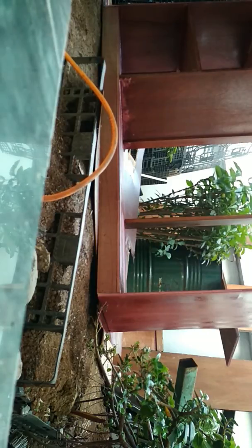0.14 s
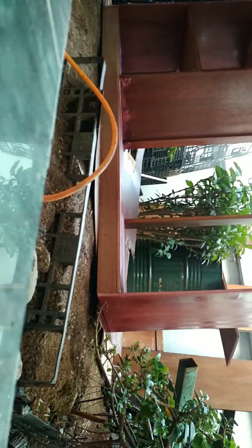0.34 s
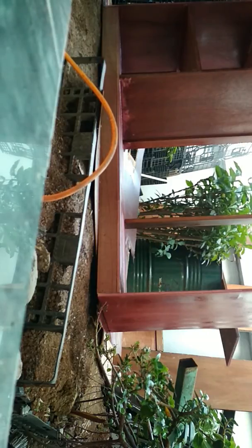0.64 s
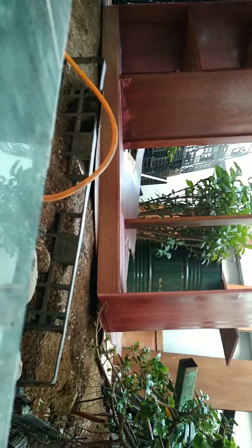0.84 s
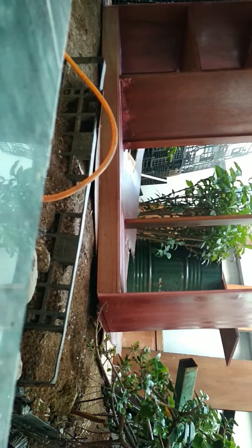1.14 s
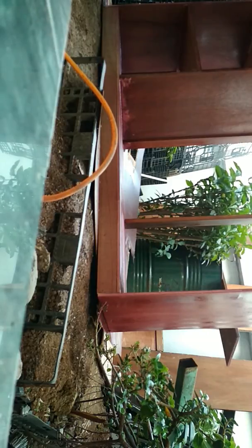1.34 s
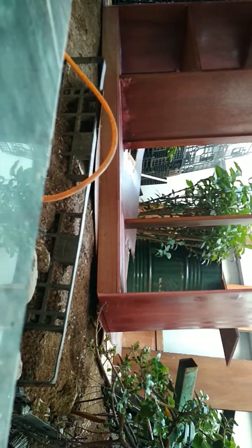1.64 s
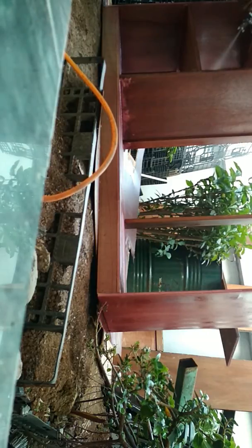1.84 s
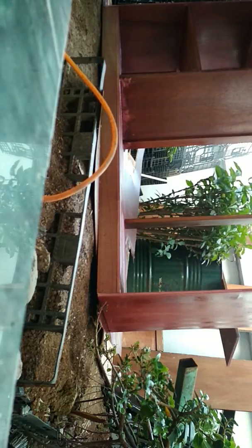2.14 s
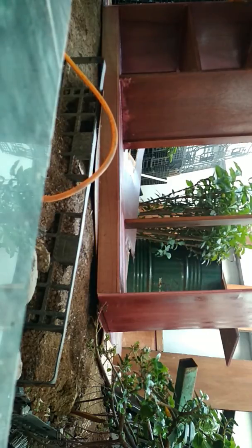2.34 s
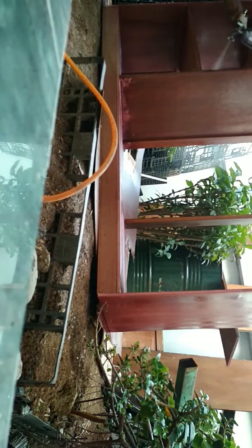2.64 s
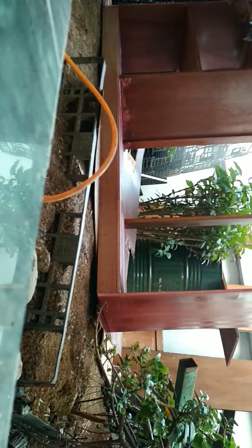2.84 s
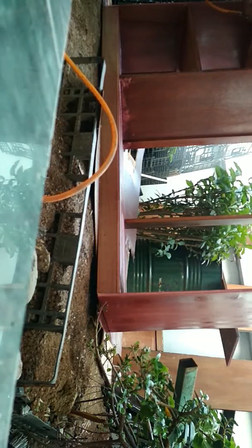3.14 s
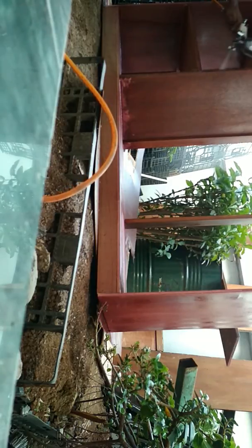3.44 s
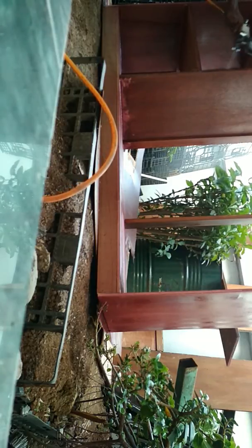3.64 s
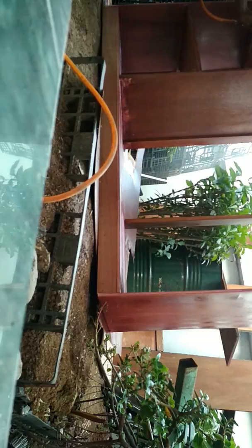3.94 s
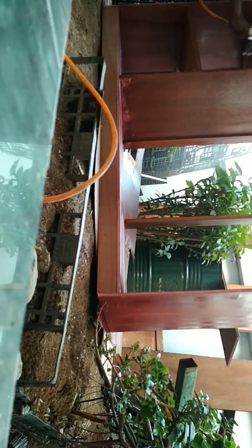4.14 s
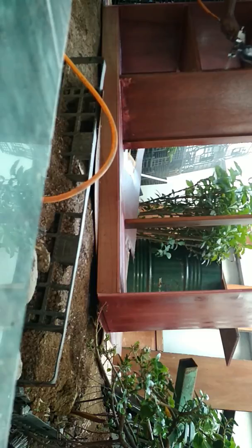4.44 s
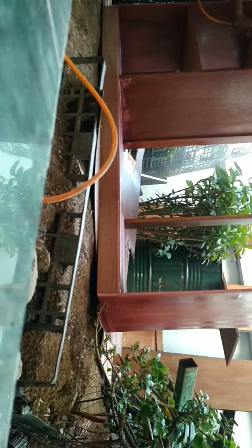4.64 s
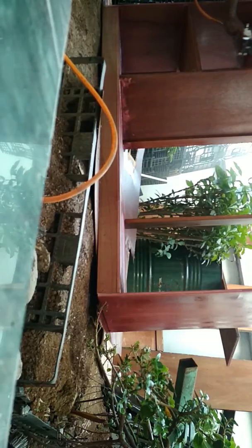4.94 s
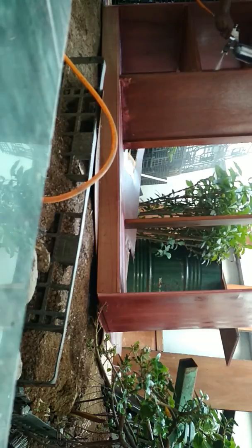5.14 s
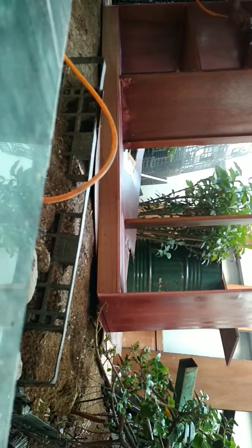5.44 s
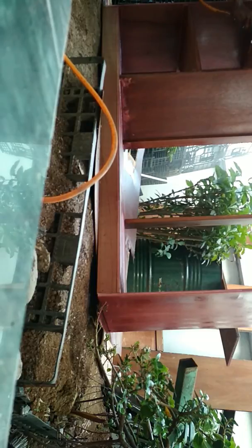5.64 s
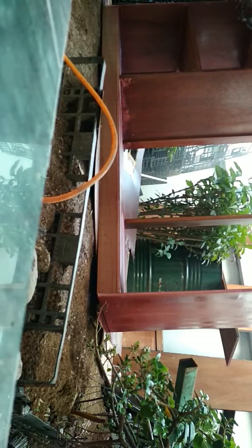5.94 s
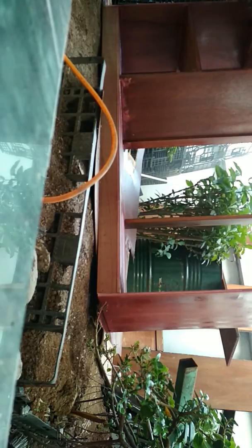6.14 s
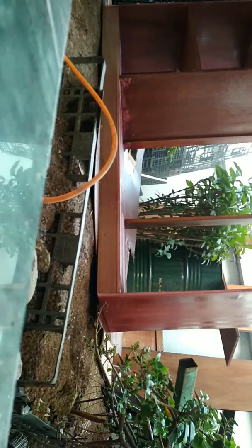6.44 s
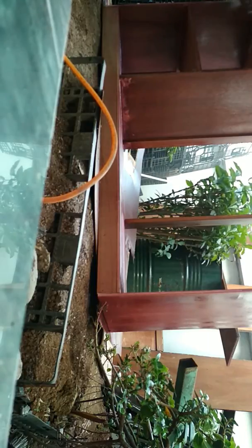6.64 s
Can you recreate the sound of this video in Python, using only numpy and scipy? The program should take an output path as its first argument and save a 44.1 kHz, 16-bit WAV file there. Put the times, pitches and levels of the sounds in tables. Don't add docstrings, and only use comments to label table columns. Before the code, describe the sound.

Throughout about seven seconds, a piston air compressor runs close to a stereo microphone on an outdoor porch. Its roughly 24 strokes per second merge into a rough, buzzing drone: hollow honks near 340 Hz, ringing tank and castings, crisp high valve ticks slightly stronger on the right, broad casing noise and a faint fan whistle. A smooth, very high spray hiss is already running, then stops at 0.36. Until 1.42 a thin pulsing leak and gritty air-line rattle replace it, with harder valve ticks. The spray returns with a tiny wet spit, and the motor whine swells around 1.5-1.7 before relaxing. Hiss continues, slowly sagging, until a small hose rustle near 5.56 and another release at 5.68. Leak and rattle return until 6.38, when spraying resumes with a lingering faint spit and milder whine. Soft low wind gusts buffet irregularly underneath.

```python
import sys
import numpy as np
from scipy import signal
from scipy.fft import rfft, irfft, next_fast_len
from scipy.io import wavfile
from scipy.ndimage import uniform_filter1d, map_coordinates

SR = 44100
rng = np.random.default_rng(int(sys.argv[2]) if len(sys.argv) > 2 else 0)


def store_pcm(level_fs):
    pcm = np.round(np.clip(level_fs, -1, 1) * 32767).astype(np.int16)
    wavfile.write(sys.argv[1], SR, np.atleast_2d(pcm).T)


def nominal_scale(level):
    x = np.asarray(level, float) / 20
    return 10 ** x


N = 298557
T = np.arange(N) / SR
TURNS_HZ, FIRST_STROKE_S = 24.027, .0278


def unit(x):
    return x / np.sqrt(np.mean(x ** 2) + 1e-20)


def along(points, hz):
    f, v = np.transpose(points)
    return np.interp(np.log(hz + 1), np.log(f + 1), v)


def wobble(rate):
    return map_coordinates(rng.standard_normal(int(N * rate / SR) + 4), [T * rate])


def swell(start_s, length_s, db, rise, fall):
    climb = rise * np.clip(start_s - T, 0, None)
    sink = fall * np.clip(T - start_s - length_s, 0, None)
    return db - climb - sink


def filtered(x, response):
    m = next_fast_len(N + SR // 2)
    return irfft(rfft(x, m) * response(np.fft.rfftfreq(m, 1 / SR)), m)[..., :N]


def rush(spectrum, alike, lead_ms, patchy_db):
    z = signal.stft(rng.standard_normal((3, N + 64)), nperseg=512)[2]
    field = uniform_filter1d(rng.standard_normal(z.shape[1:]), 6, 0)
    field = uniform_filter1d(field, 10, 1)
    both, *own = signal.istft(z * nominal_scale(patchy_db * unit(field)), nperseg=512)[1]
    late = int(lead_ms * SR / 1000 + .5)
    share = np.clip(alike, 0, 1)
    common = np.array([both[:N], both[late:late + N]])
    pair = np.sqrt(share) * common + np.sqrt(1 - share) * np.array(own)[:, :N]
    return unit(filtered(pair, lambda hz: nominal_scale(along(spectrum, hz))))


# pitch_hz, level_db_per_hz
WIND_RUMBLE = [(15, -13), (25, -24), (33, -6.5), (55, 6.5), (120, 1.5), (200, -9.5), (400, -51)]
# start_s, length_s, level_db
GUSTS = [(0.017, .01, -48), (.41, .01, -55), (.56, .01, -48.5), (.77, .01, -49), (1, .01, -42.5),
         (1.04, .35, -47.5), (1.6, 0.11, -43.5), (1.81, 0.14, -51.5), (2.43, .04, -51), (2.81, 0.14, -53.5),
         (3.4, .05, -50), (3.56, .01, -53), (3.66, .17, -52.5), (3.946, .01, -51), (4.02, .2, -54.5),
         (5.658, .01, -49), (5.76, .01, -48)]


def wind():
    breeze_db, flutter_db, edge_db_per_s = -56, 1, 180
    buffet = rush(WIND_RUMBLE, .96, 0, patchy_db=1.0)
    held = buffet / np.sqrt(abs(uniform_filter1d(buffet[0] ** 2, size=4000)) + 0.041)
    gusts = [swell(*row, edge_db_per_s, edge_db_per_s) for row in GUSTS]
    level_db = np.max(gusts + [breeze_db + flutter_db * wobble(16)], axis=0) + 1
    return nominal_scale(level_db) * held


TRIGGER_S = .02
# let_go_s, pulled_s, spit_level_db, spit_fall_db_per_s
PAUSES = [
    (0.364, 1.423, -53, 162),
    (5.68, 6.38, -62.5, 2),
]


def trigger():
    first_pull_s = -1.3
    shut = 0
    for off, on, *_ in PAUSES:
        let_go = np.clip((T - off) / TRIGGER_S + .5, 0, 1)
        pulled_again = np.clip((T - on) / TRIGGER_S + .5, 0, 1)
        shut = shut + let_go - pulled_again
    moves = np.r_[first_pull_s, np.ravel([row[:2] for row in PAUSES])]
    return 1 - shut, T - moves[np.searchsorted(moves, T, "right") - 1]


# pitch_hz, level_db_per_hz
NOZZLE = [(3240, -34), (5500, -63), (6030, -20), (7020, -16), (9590, -9), (11400, 4), (13400, -1),
          (15100, 4), (16200, -14), (16500, -32)]


def jet():
    fresh_db, sag_db_per_s = -48.5, 0.38
    pulled, since_s = trigger()
    level = nominal_scale(fresh_db - sag_db_per_s * since_s + 0.69 * wobble(14))
    return pulled * level * nominal_scale([[-1.4], [1.4]]) * rush(NOZZLE, 0.14, .24, patchy_db=0.35)


# pitch_hz, level_db_per_hz
DROPS = [(4000, -27), (7000, -8), (8500, -2), (10000, -4), (12000, -21)]


def spit():
    wet = sum(nominal_scale(swell(on + TRIGGER_S / 2, 0, db, 2500, dies)) for _, on, db, dies in PAUSES)
    return wet * rush(DROPS, 0.45, 0.21, patchy_db=2.5)


# pitch_hz, level_db_per_hz
LEAK = [(3240, -49), (5500, -32), (6370, -30), (7910, -6.5), (9950, -16), (11000, 2.5), (15500, -2),
        (16100, 3), (16500, -39)]


def leak():
    pulse_db, peak_turn = 2.4, .1
    seep = nominal_scale(2.4 * wobble(200)) * rush(LEAK, .4, .24, patchy_db=.6)
    turn = TURNS_HZ * (T - FIRST_STROKE_S) - peak_turn
    seep = seep * nominal_scale(pulse_db * np.cos(2 * np.pi * turn))
    return (1 - trigger()[0]) * nominal_scale([[-55.5], [-52.5]]) * seep


# pitch_hz, level_db_per_hz
RATTLE = [(940, -26), (1600, -9), (2100, -4), (2430, 3), (2880, -5), (3820, -3), (5020, -9), (6380, -5.5),
          (7000, -9), (9100, -45), (15400, -120)]


def rattle():
    pulled, since_s = trigger()
    shut_line = (1 - pulled) * nominal_scale(-58 - 3.5 * since_s)
    open_line = pulled * nominal_scale(-66 - 3 * since_s)
    rustle = nominal_scale(swell(5.56, 0, -60, 350, 120))
    grit = nominal_scale(2.8 * wobble(250) + 1.6 * wobble(30) - .6)
    return (shut_line + open_line + rustle) * grit * rush(RATTLE, .55, .24, patchy_db=.3)


def gun():
    return jet() + spit() + leak() + rattle()


RELAXED_DB = -65
# start_s, length_s, slot_tone_level_db
STRAINS = [
    (1.48, 0.26, -51),
    (6.35, .4, -56),
]


def strain_db():
    rise_db_per_s, fall_db_per_s = 40, 12
    strains = [swell(*row, rise_db_per_s, fall_db_per_s) for row in STRAINS]
    return np.max(strains + [RELAXED_DB + 0 * T], axis=0)


# time_s, lag_ms
SHAFT_LAG = [(0, -.29), (.5, -.35), (1, -.28), (1.5, -.03), (2.1, .23), (2.6, .32), (4, .34), (5, .14),
             (6, -.26), (6.6, -.31)]


def shaft_lag_ms(time_s):
    return np.interp(time_s, *np.transpose(SHAFT_LAG))


def whine(order_share=0.25):
    lag_ms = shaft_lag_ms(T)
    order = 2 * np.pi * 49 * TURNS_HZ * (T - lag_ms / 1000) + np.array([[1.6], [2.6]])
    slip = 2 * np.pi * (-5.15 + 3.74 * T + .5 * lag_ms)
    slot = order_share * np.cos(order) - np.cos(order - slip)
    upper = (1 - 0.72 * np.cos(slip)) * np.sin(2 * np.pi * 1292 * T + .5 * wobble(6.6))
    upper_db = -73 + 0.46 * (strain_db() - RELAXED_DB)
    return nominal_scale(strain_db() + 0.5) * slot + nominal_scale(upper_db) * upper


def fan():
    load_db = .6 * (strain_db() - RELAXED_DB)
    fan_db = -66 - load_db + 4 * (1 - trigger()[0])
    phase = 2 * np.pi * 2378.5 * T + .5 * wobble(6) + np.array([[-2], [2]])
    return nominal_scale(fan_db + 1.5 * wobble(5)) * np.sin(phase)


# pitch_hz, level_db_per_hz
CASING = [(130, -36), (190, 2), (340, -5), (520, 4), (820, -1), (1020, 12), (1120, 4), (1900, -3),
          (2300, -4), (2900, -15), (3900, -14.5), (6000, -18.5), (8000, -41)]
# pitch_hz, level_db_per_hz
SHROUD = [(480, -72), (570, -3), (620, 8), (670, -47), (800, -67)]
# pitch_hz, level_db
MOTOR_LINES = [(1021, -66), (3558, -87), (3880, -88), (2514, -88)]


def motor():
    casing_level = nominal_scale(-53.5 + 0.3 * wobble(3.4)) * nominal_scale([[-.4], [.4]])
    casing = casing_level * rush(CASING, 0.64, .24, patchy_db=2.84)
    panel = nominal_scale([[-72], [-60]]) * rush(SHROUD, 0.99, 0.11, patchy_db=0.5)
    lines = 0
    for hz, db in MOTOR_LINES:
        level = nominal_scale(db + 3 + 2.5 * wobble(6))
        lines = lines + level * np.sin(2 * np.pi * hz * T + .5 * wobble(8))
    return casing + panel + lines + fan() + whine()


def strokes(jitter_ms):
    s = FIRST_STROKE_S + np.arange(-12, int(N / SR * TURNS_HZ) + 1) / TURNS_HZ
    return s + (shaft_lag_ms(s) + jitter_ms * rng.standard_normal(len(s))) / 1000


# moment_ms, pitch_hz, width_hz, left_level_db, right_level_db
TICKS = [
    (1, 10900, 350, -44, -37.5),
    (1.1, 9200, 400, -60, -57),
    (1.2, 12100, 400, -50, -46),
    (1.4, 14200, 900, -52, -50),
    (7, 10800, 600, -55, -51),
    (17.6, 13800, 1200, -50, -48),
    (17.6, 10900, 700, -54, -50),
    (29.2, 11200, 900, -54, -50),
    (29.6, 14200, 1200, -54, -52),
]


def valves(scatter_db=1.5, burst_ms=.4, idle_db=5):
    out, starts, t = np.zeros((2, N)), strokes(.1), np.arange(256) / SR
    for at_ms, hz, width_hz, left_db, right_db in TICKS:
        contacts = rng.standard_normal((len(starts), len(t))) * t * np.exp(-t * 1000 / burst_ms)
        reed = t * np.exp(-2 * np.pi * width_hz * t) * np.sin(2 * np.pi * hz * t)
        slap = signal.fftconvolve(contacts, reed[None], axes=1)[:, :len(t)]
        strength = nominal_scale(scatter_db * rng.standard_normal((len(starts), 1)))
        slap *= strength / abs(slap).max(1, keepdims=True)
        row = np.zeros(N + 2 * SR)
        first = ((starts + at_ms / 1000 + 1) * SR).astype(int)
        row[first[:, None] + np.arange(len(t))] = slap
        out += nominal_scale([[left_db], [right_db]]) * [row[SR:][:N], row[SR + 10:][:N]]
    return out * nominal_scale(idle_db * (1.5 - trigger()[0]))


def honk(hz, open_ms, fade, overtone_fade, skew):
    t = np.arange(SR // 40) / SR
    opening = np.clip(t / .00115, 0, 1)
    closing = np.clip((open_ms / 1000 - t) / .00215, 0, 1)
    tone = -nominal_scale([[-24.9], [-25.8]]) * np.exp(-fade * t) * np.sin(2 * np.pi * hz * t)
    octave = -nominal_scale([[-42.6], [-25.9]]) * np.exp(-overtone_fade * t) * np.sin(4 * np.pi * hz * t - skew)
    return opening * closing * (tone + octave)


# pitch_hz, t60_s, left_level_db, right_level_db, moment_ms,
# right_lead_ms
RINGS_LOW = [(52.2, 0.154, -56.1, -57.6, 9.03, -1.23), (141.4, 0.111, -49.5, -49.7, 5.76, 0.01),
             (211.3, 0.06, -49.9, -47.1, 13.88, 0.62), (237.8, 0.24, -58.9, -62.0, 31.71, -0.16),
             (329.3, 0.174, -36.4, -34.1, 10.76, 0.08), (367.0, 0.296, -38.8, -45.6, 19.1, -0.52),
             (432.5, 0.55, -56.1, -56.2, 38.95, 0.26), (440.6, 0.02, -38.6, -34.2, 3.36, 0.35),
             (444.7, 0.095, -45.3, -54.8, 23.51, 0.44), (553.3, 0.13, -48.6, -44.4, 30.47, 0.32)]
RINGS_MID = [(604.3, 0.55, -49.1, -42.7, 18.5, -1.21), (670.0, 0.079, -46.8, -48.7, 27.98, 0.18),
             (727.9, 0.187, -44.8, -49.0, 10.39, -0.89), (751.3, 0.105, -52.7, -48.5, 30.44, -0.24),
             (789.8, 0.287, -56.3, -52.8, 32.66, 0.01), (825.7, 0.109, -53.5, -57.2, 3.16, -0.28),
             (853.2, 0.55, -61.5, -53.9, 16.56, 0.31), (934.8, 0.38, -53.9, -53.9, 13.45, -0.95),
             (1014.9, 0.302, -56.4, -49.6, 30.75, 0.02), (1026.2, 0.088, -50.1, -42.0, 2.54, 0.99)]
RINGS_HIGH = [(1037.0, 0.193, -55.4, -57.6, 13.92, -0.1), (1148.8, 0.535, -60.7, -66.0, 2.94, 1.09),
              (1171.2, 0.175, -53.5, -49.6, 39.12, 0.1), (1241.8, 0.55, -66.3, -67.1, 25.65, 0.0),
              (1351.7, 0.138, -73.7, -64.1, 27.62, 0.01), (1422.6, 0.087, -57.1, -55.7, 31.27, 0.19),
              (1555.4, 0.074, -58.8, -59.6, 32.61, -0.4), (1572.6, 0.55, -60.4, -66.4, 6.88, 0.17),
              (1736.5, 0.051, -64.8, -56.5, 39.24, 0.2)]


def pump(honk_scatter_db=.3, ring_scatter_db=.5, jitter_ms=.01):
    m = next_fast_len(N + SR)
    hz = np.fft.rfftfreq(m, 1 / SR)
    hz = hz[hz < 2500]
    jw = 2j * np.pi * hz
    starts = strokes(jitter_ms)
    body = RINGS_LOW + RINGS_MID + RINGS_HIGH
    scatter = np.r_[honk_scatter_db, np.full(len(body), ring_scatter_db)]
    sizes = nominal_scale(scatter * rng.standard_normal((len(starts), len(scatter))))
    trains = sizes.T @ np.exp(-np.outer(starts, jw))
    shape = honk(337.2, 17.54, 30, 182, skew=2.38)
    right_early = np.exp(np.outer([0, .0002], jw))
    out = trains[0] * rfft(shape, m)[:, :len(hz)] * right_early
    for train, (f, t60, left_db, right_db, at_ms, lead_ms) in zip(trains[1:], body):
        w = 2 * np.pi * f
        ring = SR * w / ((np.log(1000) / t60 + jw) ** 2 + w * w)
        arrive = np.array([at_ms + .48, at_ms + .48 - lead_ms]) / 1000
        out = out + train * ring * nominal_scale([[left_db], [right_db]]) * np.exp(-np.outer(arrive, jw))
    return irfft(out, m)[:, :N]


def scene():
    return wind() + gun() + motor() + valves() + pump()


def band_limit(x):
    return signal.sosfilt(signal.butter(12, 16300, fs=SR, output="sos"), x)


def record(dry):
    narrow = filtered(dry, lambda hz: hz < 15900)
    return band_limit(narrow)


dry = scene()
out = record(dry)
store_pcm(out)
```